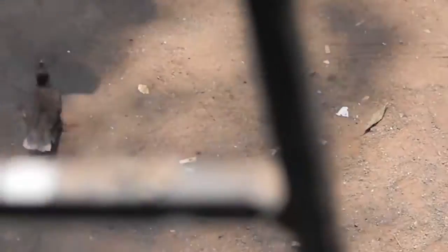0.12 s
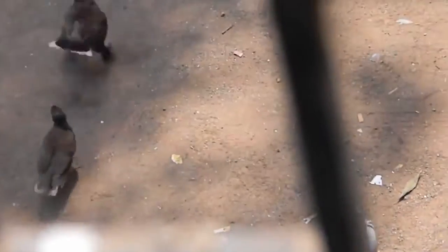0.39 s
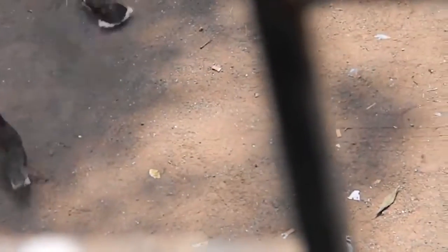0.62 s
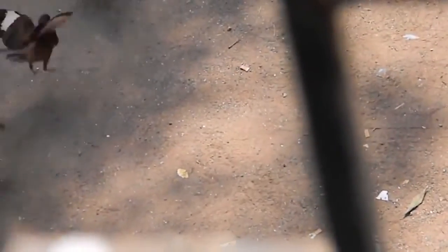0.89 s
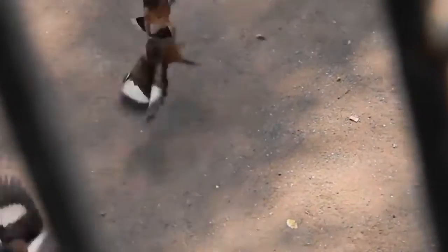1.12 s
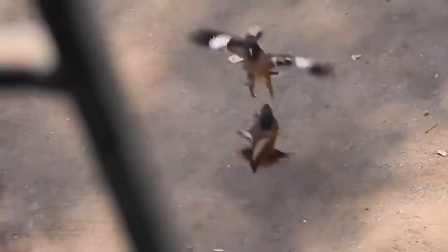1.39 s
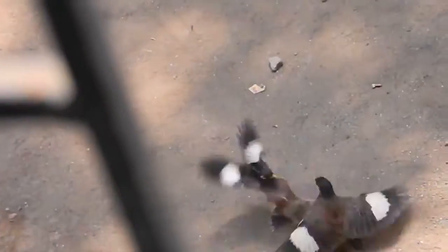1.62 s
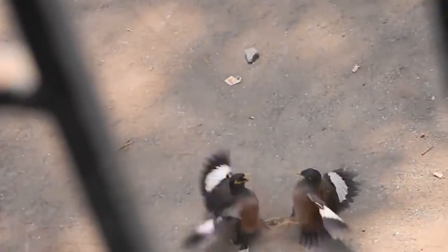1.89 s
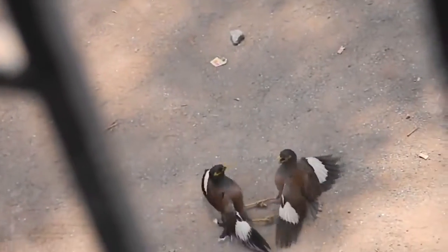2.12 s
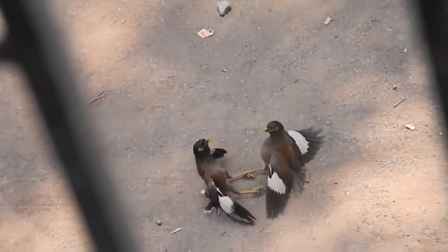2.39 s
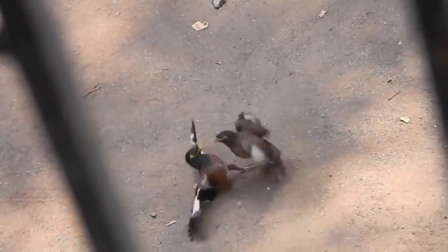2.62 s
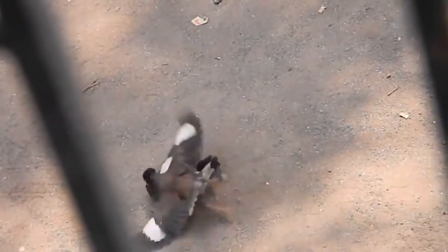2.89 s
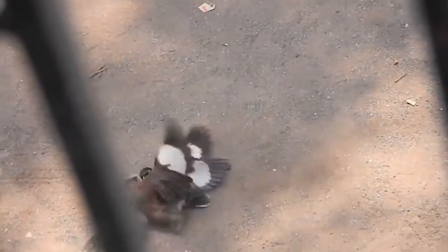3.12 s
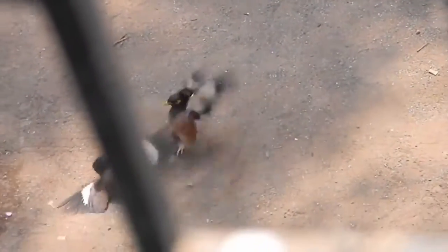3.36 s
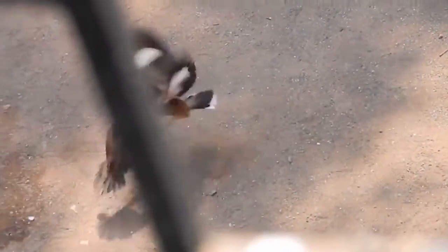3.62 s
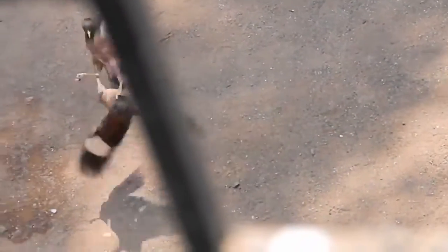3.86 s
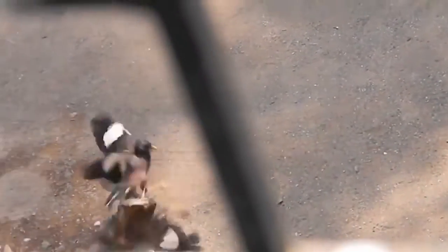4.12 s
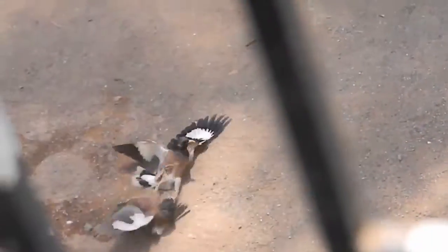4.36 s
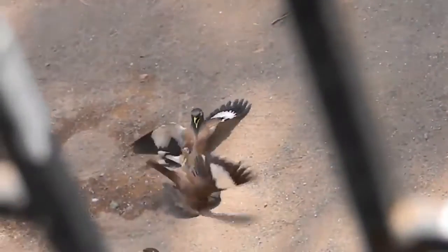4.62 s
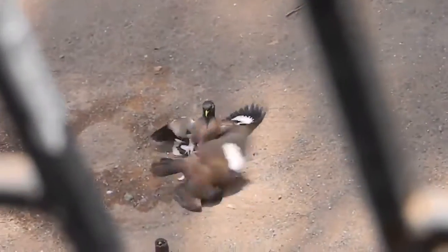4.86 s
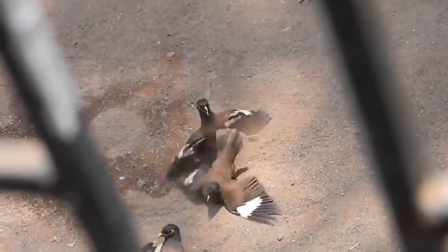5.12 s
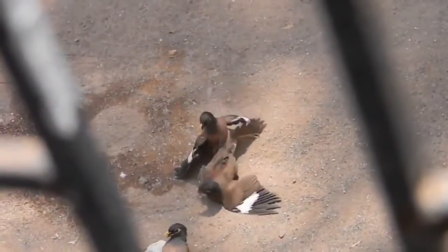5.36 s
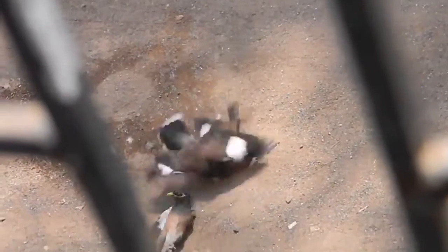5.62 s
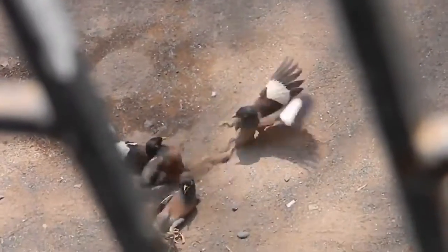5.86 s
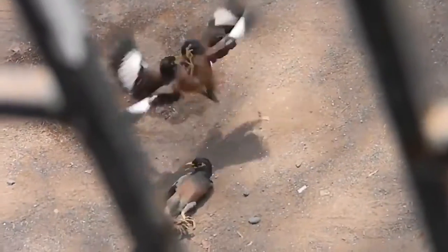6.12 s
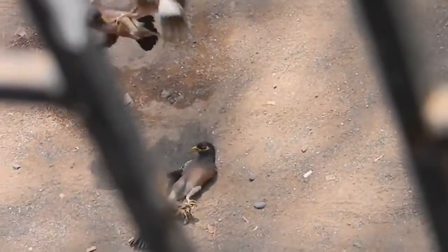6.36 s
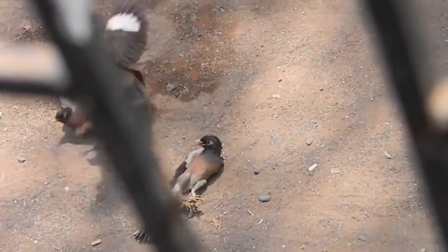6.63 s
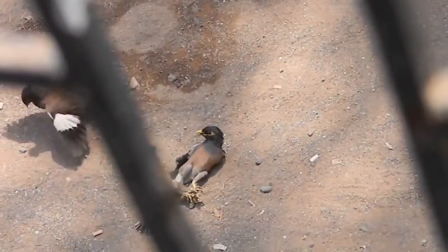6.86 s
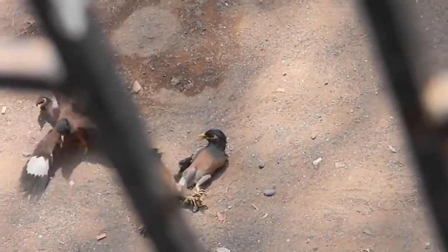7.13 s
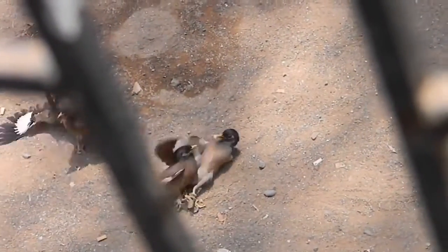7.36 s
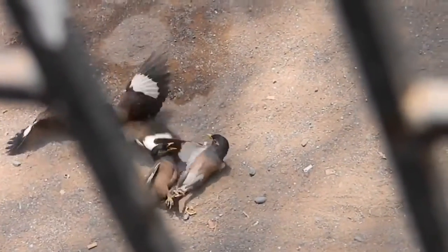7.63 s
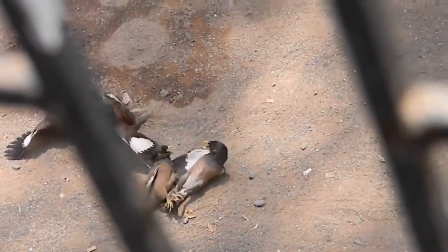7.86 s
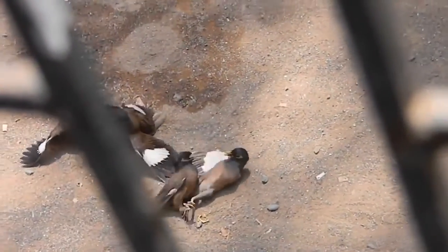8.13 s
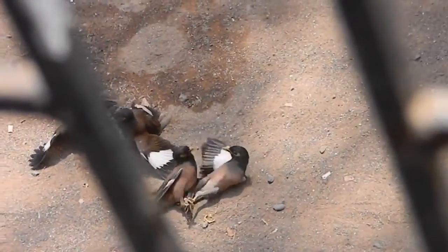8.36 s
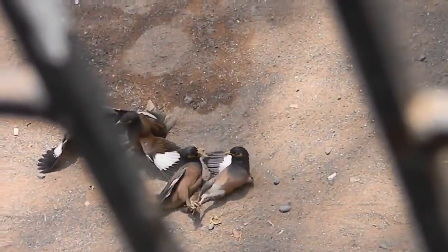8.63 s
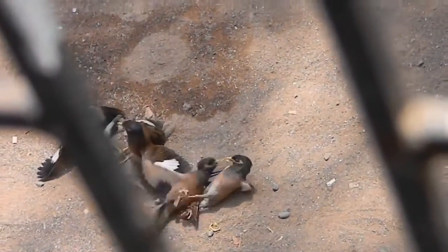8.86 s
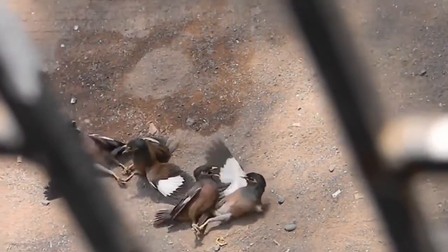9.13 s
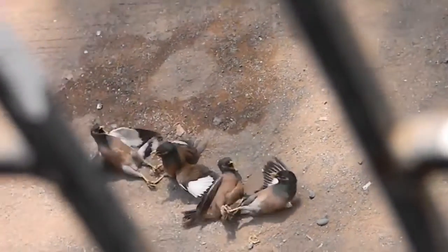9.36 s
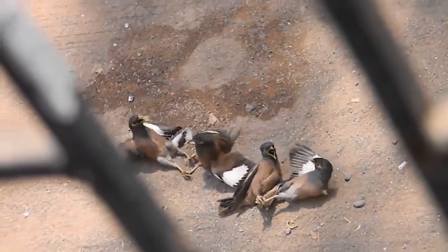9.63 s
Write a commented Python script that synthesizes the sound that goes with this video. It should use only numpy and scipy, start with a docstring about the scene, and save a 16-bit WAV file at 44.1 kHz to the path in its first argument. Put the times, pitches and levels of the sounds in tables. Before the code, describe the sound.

From 0 s a flock of mynas is mid-fight on paved ground, giving a dense, unbroken stream of very short, high calls. Harsh noisy squawks and breathy rasps mix with hoarse chirps, thin whistles scooping upward, swoops that plunge and level off, drooping notes and buzzing trills. Fainter birds chatter constantly behind. Around 1.3 s the distant town bass swells briefly. From 3 to 5 s the calls are a little more spaced, with some lower, fainter glides; layered, falling cries begin near 4.9 s. Strong sharp shrieks burst out about 5.5-6.3 s, and loud chirps again around 7.5-7.7 s. From 8 to 9.7 s harsh squawks and double-stroke cries recur a few times a second, ending mid-quarrel. A light wall echo follows everything, over a muted traffic wash and very faint wavering low hum. Close stereo pickup; the background ducks under loud calls.

```python
"""Chirps and harsh squawks break out at once over a town's steady wash: mynas fight on paved ground below a railing.
Whistles, swoops, drooping notes, trills and cries overlap, each a pitch law driving a voice of partials; squawks and
rasps are bands of noise. Ground and walls throw the birds back as early bounces and a random-tap tail, while shaped
noise makes the town and a wavering low tone its hum. A small recorder with two ports and gain control listens."""
import sys
import numpy as np
from scipy import signal
from scipy.fft import rfft, irfft, next_fast_len
from scipy.io import wavfile
from scipy.ndimage import uniform_filter1d

SR = 44100
rng = np.random.default_rng(int(sys.argv[2]) if len(sys.argv) > 2 else 0)


def ratio_of_db(decibels):
    """Turn decibels (scalar or array-like) into linear amplitude factors; 0 dB maps to 1."""
    return 10 ** (np.asarray(decibels, float) / 20)


def int16_out(signal):
    """Quantize to a 16-bit WAV file."""
    q = np.round(np.clip(np.atleast_2d(signal).T, -1, 1) * 32767)
    wavfile.write(sys.argv[1], SR, q.astype(np.int16))


N = 429534

# Levels in the tables are relative: source gains and the recorder's gain come on top.
# whistles that scoop up into a held note:
# (time [s], length [s], pitch [Hz], level [dB], octave overtone [dB])
WHISTLES = [(0.194, 0.049, 4390, -22.5, -29), (0.535, 0.058, 4390, -20.5, -33),
            (1.14, 0.03, 4165, -21, -15), (1.51, .03, 4290, -28, -27), (1.946, 0.056, 4220, -20, -37),
            (2.309, 0.054, 4335, -26.5, -26), (2.676, 0.053, 4323, -23.5, -26),
            (2.877, 0.026, 3380, -20.5, -24), (4.052, 0.061, 4030, -24, -12),
            (4.664, 0.017, 4450, -23, -41), (6.544, 0.035, 4320, -22.5, -26),
            (6.735, 0.063, 4055, -31.5, -17), (6.855, 0.035, 4420, -25.5, -24),
            (7.253, 0.032, 4410, -27.5, -22.5), (7.657, 0.038, 4350, -23, -25),
            (8.325, 0.038, 4320, -23.5, -23)]
# swoops that drop fast and level off:
# (time [s], length [s], top [Hz], bottom [Hz], settling time [s], level [dB])
SWOOPS = [(0.059, 0.043, 3300, 1514, 0.025, -23.5), (0.411, 0.092, 6700, 1610, 0.034, -20),
          (0.748, .04, 3200, 1480, 0.021, -26), (1.05, 0.11, 6600, 1603, 0.033, -23),
          (1.387, 0.066, 3800, 1415, 0.025, -25), (1.453, 0.024, 3900, 2170, 0.013, -23),
          (1.567, 0.07, 2850, 2315, 0.0089, -18.5), (2.59, 0.059, 3240, 2230, 0.0083, -23),
          (2.917, 0.035, 3800, 2905, .01, -23), (3.052, 0.038, 3500, 2006, 0.017, -19.5),
          (3.57, .042, 6700, 3100, .012, -22), (3.632, 0.049, 3300, 1426, .045, -22),
          (4.346, 0.046, 3500, 1816, 0.016, -24), (4.742, 0.036, 3800, 1785, 0.022, -20.5),
          (5.123, 0.031, 3500, 1830, 0.019, -25), (5.408, 0.069, 3500, 2300, 0.013, -20.5),
          (5.559, 0.036, 6500, 3770, 0.0054, -15.5), (5.591, 0.094, 3850, 3092, 0.016, -15.5),
          (5.707, 0.022, 2900, 1980, .015, -18.5), (5.944, 0.033, 6500, 3670, 0.0065, -26),
          (5.959, 0.061, 3600, 2860, .03, -21), (6.17, .025, 5800, 3360, 0.0054, -23),
          (6.201, 0.089, 3400, 2993, 0.055, -16), (6.774, .043, 3500, 1970, .018, -19.5),
          (6.903, 0.1, 3700, 2566, 0.02, -16.5), (7.129, 0.031, 3400, 1920, 0.013, -17),
          (7.171, 0.079, 6600, 1695, 0.031, -19.5), (7.295, 0.15, 3600, 2495, .04, -21.5),
          (7.415, 0.04, 3300, 1894, 0.02, -24), (8.025, 0.074, 4200, 2156, 0.017, -19),
          (8.364, 0.027, 3400, 1900, 0.018, -18.5), (8.698, 0.053, 3200, 2135, 0.013, -21.5),
          (8.998, .04, 3500, 2020, 0.014, -23.5), (9.428, 0.063, 3340, 2320, .01, -22),
          (9.614, 0.05, 3500, 1770, .02, -27)]
# held notes that bend away at the end: (time [s], length [s], first pitch [Hz], last pitch [Hz], level [dB])
DROOPS = [(0.262, .08, 3080, 2740, -22), (0.329, 0.051, 2100, 1765, -28), (0.844, .051, 2746, 2780, -20),
          (2.009, 0.081, 3013, 2320, -17), (2.156, 0.088, 3080, 2305, -24),
          (2.364, 0.097, 2970, 2490, -19.5), (2.649, .054, 2980, 2640, -22.5),
          (2.733, 0.064, 2967, 2810, -21), (2.93, 0.1, 3060, 1900, -22.5),
          (3.781, 0.077, 2710, 1950, -28.5), (4.117, 0.084, 3066, 2134, -17.5),
          (4.197, 0.046, 2550, 2180, -26), (4.556, 0.036, 2454, 2150, -23.5),
          (4.856, 0.029, 3570, 3400, -22), (4.88, 0.088, 2525, 2130, -23), (5.59, 0.11, 2484, 2025, -23),
          (5.972, 0.073, 2574, 2210, -17.5), (6.291, 0.075, 2620, 2265, -19), (7.0, 0.07, 2515, 2200, -24),
          (7.714, 0.097, 2530, 2250, -17), (7.804, 0.036, 2250, 1890, -26), (8.401, .08, 2620, 1994, -19),
          (8.923, .055, 2304, 1500, -22.5), (9.304, 0.045, 3310, 1860, -21)]
# notes chopped by the second membrane: (time [s], length [s], first pitch [Hz], last pitch [Hz], level [dB])
TRILLS = [(0.595, 0.087, 3350, 3320, -26.5), (1.729, 0.088, 3230, 3370, -21),
          (2.455, 0.1, 3200, 3320, -22.5), (3.249, 0.092, 3220, 3214, -20.5),
          (6.607, .093, 3350, 3200, -22.5), (7.466, 0.084, 3540, 3380, -22.5),
          (8.11, 0.082, 3430, 3450, -26), (8.763, 0.12, 3340, 3380, -24.5), (8.872, 0.069, 3510, 2880, -22),
          (9.125, .075, 4150, 3920, -26), (9.138, 0.054, 5560, 5100, -27.5), (9.2, 0.063, 3300, 3280, -27),
          (9.538, 0.085, 4070, 4140, -28.5), (9.538, .09, 5980, 6050, -37)]
# straight glides: (time [s], length [s], first pitch [Hz], last pitch [Hz], level [dB])
CHIRPS = [(0.001, 0.024, 3040, 3420, -24), (0.238, 0.034, 2480, 2980, -26), (0.065, .075, 3650, 3600, -27),
          (0.356, 0.032, 3085, 2580, -27), (0.617, 0.038, 2950, 2900, -20.5),
          (0.715, 0.054, 3360, 3120, -26.5), (0.789, 0.035, 2610, 3700, -26),
          (0.824, 0.029, 3980, 3260, -22.5), (0.804, .024, 6030, 6050, -31),
          (0.908, 0.025, 2516, 2700, -22.5), (0.918, 0.04, 4380, 4210, -24.5),
          (1.175, 0.024, 3520, 2790, -28.5), (2.085, 0.031, 2300, 1100, -31),
          (2.452, 0.027, 2400, 1750, -28), (3.04, 0.05, 1880, 1150, -36), (7.835, 0.047, 1800, 1264, -30),
          (5.93, 0.014, 3600, 2300, -21.5), (0.957, 0.019, 3710, 3570, -21.5),
          (1.308, 0.045, 2094, 2440, -25), (1.359, 0.044, 4830, 5450, -30), (1.475, 0.035, 2540, 2960, -29),
          (1.827, 0.029, 3160, 3110, -17), (1.847, 0.065, 2240, 2127, -26.5),
          (1.87, 0.022, 4350, 3820, -32), (2.098, 0.063, 2920, 3860, -24.5), (2.222, .106, 3560, 3370, -29),
          (2.324, 0.031, 3450, 3500, -28), (2.57, 0.026, 3290, 3230, -23), (2.634, .019, 3530, 3500, -24),
          (2.74, 0.048, 2140, 1950, -27), (3.358, 0.013, 3230, 3300, -17), (3.397, 0.071, 3270, 3300, -35),
          (3.388, .06, 2250, 2140, -28), (3.536, 0.017, 1970, 5100, -30), (3.541, 0.01, 5140, 6670, -19.5),
          (3.582, 0.075, 3740, 3930, -23), (3.699, .033, 2230, 3650, -27), (3.705, .036, 5080, 5260, -32),
          (3.728, .05, 2155, 2350, -24), (3.733, 0.019, 3590, 3510, -19), (3.859, 0.22, 1710, 1658, -29),
          (4.073, 0.035, 2200, 3520, -24), (4.253, 0.045, 2210, 2480, -27), (4.425, 0.03, 2234, 3290, -22),
          (4.471, 0.025, 3490, 3460, -30), (4.481, 0.056, 2895, 2480, -26), (4.47, 0.15, 1756, 1590, -30),
          (4.76, 0.04, 4250, 3750, -26.5), (4.82, 0.026, 2230, 3520, -21), (5.052, 0.106, 1703, 1645, -29),
          (5.07, .028, 3560, 4050, -29), (5.355, 0.043, 3570, 3880, -32.5), (5.53, 0.013, 2200, 6600, -27),
          (5.798, 0.054, 3150, 3150, -29.5), (5.906, .012, 4840, 6670, -19), (5.9, .013, 2190, 4900, -30),
          (6.112, 0.071, 2415, 2370, -21.5), (6.145, 0.017, 3100, 3140, -17.5),
          (6.26, 0.026, 6430, 3850, -28), (6.401, 0.031, 3090, 3160, -32), (6.568, 0.13, 2280, 2645, -24),
          (6.586, 0.057, 3040, 2890, -23), (6.9, 0.038, 4060, 4070, -24), (7.135, .02, 5140, 6150, -31),
          (7.196, 0.032, 6300, 4000, -32), (7.328, 0.036, 5800, 5270, -34.5),
          (7.428, 0.029, 5030, 5190, -30), (7.551, 0.044, 3960, 4340, -16),
          (7.604, 0.087, 3110, 3050, -24.5), (7.616, 0.1, 2210, 2510, -24.5),
          (7.7, 0.011, 3420, 3400, -14.5), (7.733, .013, 3300, 3210, -19), (7.949, 0.05, 3270, 3280, -29),
          (8.318, 0.022, 3700, 3580, -24), (8.346, 0.02, 3140, 3470, -15.5), (8.48, 0.044, 2070, 1710, -28),
          (8.609, 0.046, 2130, 2580, -27), (8.736, 0.047, 4570, 4350, -36), (9.071, 0.045, 5980, 5860, -38),
          (9.058, 0.039, 3100, 2910, -25), (9.276, 0.016, 3030, 2950, -14),
          (9.286, .034, 2424, 1780, -21.5), (9.64, 0.07, 3530, 3600, -24),
          (9.701, 0.039, 3940, 3740, -28.5)]
# harsh noisy squawks: (time [s], nominal length [s], effort [dB], centre [Hz])
SQUAWKS = [(0.009, 0.048, -23.5, 4570), (0.239, 0.1, -26, 4290), (0.357, 0.058, -33.5, 4830),
           (0.561, 0.091, -32.5, 4410), (0.786, 0.077, -41, 4740), (0.901, 0.28, -32, 4660),
           (1.315, 0.14, -36, 4680), (1.511, 0.049, -28.5, 4320), (1.725, 0.085, -39.5, 4670),
           (1.875, 0.13, -29, 4390), (2.101, 0.075, -31, 4250), (2.225, 0.089, -34, 4670),
           (2.35, 0.032, -32, 4240), (2.6, 0.069, -37, 4320), (2.709, 0.052, -31, 4290),
           (2.996, 0.054, -32, 4600), (3.528, 0.074, -32.5, 4640), (3.709, 0.049, -44, 4230),
           (4.041, 0.11, -33, 3950), (4.276, 0.07, -32, 4610), (4.676, 0.13, -33.5, 4440),
           (4.888, 0.066, -29.5, 4330), (5.066, 0.087, -27.5, 4340), (5.369, 0.11, -28, 4100),
           (5.521, 0.15, -31.5, 4260), (5.896, 0.072, -31.5, 5070), (6.158, 0.084, -33, 4230),
           (6.557, 0.088, -36, 4220), (6.647, 0.19, -35, 4380), (6.874, 0.024, -40, 4400),
           (7.074, 0.12, -31.5, 4730), (7.363, 0.076, -32.5, 4740), (7.456, 0.031, -33, 4020),
           (7.626, 0.054, -28.5, 4200), (7.977, 0.095, -30.5, 4460), (8.07, 0.095, -32.5, 4140),
           (8.245, 0.1, -25.5, 4250), (8.525, 0.26, -30, 4320), (8.639, 0.044, -32, 4640),
           (8.77, 0.088, -26.5, 4310), (8.959, 0.1, -26, 4260), (9.132, 0.25, -31, 4150),
           (9.406, 0.097, -27.5, 4140), (9.573, 0.09, -26, 4430)]
# noise bands of a squawk: (place [multiple of the centre], smoothing width [Hz], level [dB])
SQUAWK_BANDS = [(.62, 1200, -8.5), (1.05, 900, -8.5), (1.35, 1270, -6), (2.15, 1880, -10),
                (3.198, 4000, -19.5)]
# cries of stacked partials in two falling strokes:
# (time [s], length [s], first pitch [Hz], last pitch [Hz], level [dB])
CRIES = [(4.899, 0.061, 3260, 2970, -30), (5.131, 0.059, 3450, 2890, -32),
         (5.377, 0.073, 3445, 3055, -30.5), (7.974, .09, 3280, 2935, -32.5),
         (8.249, 0.078, 3390, 2990, -34.5), (8.526, 0.065, 3275, 2956, -30),
         (8.786, 0.072, 3310, 2810, -29), (8.982, 0.075, 3290, 2840, -34.5),
         (9.21, 0.076, 3220, 2870, -32.5), (9.419, 0.067, 3260, 3010, -34), (9.615, 0.071, 3330, 3050, -36)]
# short rasps of breath noise, most of them ahead of a swoop: (time [s], length [s], centre [Hz], level [dB])
RASPS = [(0.006, 0.057, 4600, -25.5), (0.283, 0.053, 4800, -25), (0.594, .045, 4560, -27),
         (3.007, .042, 4550, -25.5), (4.303, 0.034, 4650, -22), (4.699, 0.047, 4440, -18.5),
         (5.078, .044, 4880, -24), (6.743, 0.046, 4840, -24), (7.087, 0.043, 4800, -23),
         (7.372, .042, 4720, -22.5), (8.658, .045, 4600, -22), (8.96, 0.034, 4680, -37),
         (9.58, 0.033, 4480, -27)]
# added partials of the voice: (partial [multiple of a third of the pitch], level [dB])
STACK = [(2, -14.5), (4, 5), (5, -4.5), (6, -41), (7, -15.5)]
# first answers of the ground and nearest walls: (delay [s], level against the direct sound [dB])
BOUNCES = [(.0013, -24), (.0031, -10), (.0062, -12.5)]
# dying time of the wall echo: (frequency [Hz], t60 [s])
WALL_DECAY = [(1000, 0.92), (3000, 0.71), (8000, 0.62)]
# colour of the town wash: (frequency [Hz], relative density [dB])
TOWN_COLOUR = [(15, -65), (30, -50), (50, -26), (76, -4.5), (137, 2), (307, -10), (425, 0), (654, -3),
               (1470, -3.5), (2330, -7), (3050, -9), (5820, -17), (6850, -26), (8270, -23), (11100, -36),
               (15800, -37.5)]
# swell of traffic and breeze, used around its mean: (time [s], bass level [dB])
RUMBLE = [(0.0, -36.5), (1.16, -37), (1.27, -27.5), (2.12, -36.5), (2.28, -32), (2.47, -40), (3.5, -32),
          (6.16, -34), (6.35, -42), (6.37, -35), (9.52, -36), (9.74, -41)]
# likeness of the wash at both ports: (frequency [Hz], correlation [0 to 1])
LIKENESS = [(60, 0.88), (250, 1), (700, 0.75), (1500, 0.44), (3000, 0.32), (10000, 0.71)]
# a faint wavering low hum, perhaps of far machines: (frequency [Hz], level [dB])
HUM = [(430.7, -46)]
# phase lead of the left port: (frequency [Hz], lead [radians])
PORT_LEAD = [(20, 0.2), (230, -0.22), (340, -1.78), (950, -1.53), (1460, -1.73), (1720, -1.88), (2240, 1.3),
             (3010, 1.3), (3790, 0.82), (4050, 1.3), (4390, 1.07), (5250, 1.1), (6030, 1.1), (9220, 0.45),
             (15600, 0.38)]
# level balance of the ports: (frequency [Hz], left minus right [dB])
PORT_TILT = [(60, 3), (110, 0.5), (200, 2.5), (380, 3), (700, -1.5), (1290, -6), (2380, -8), (4400, -2),
             (8120, -1.0), (15000, 1)]
# complex white noise from which every hoarse voice takes a stretch
TURBULENCE = rng.standard_normal(4 * SR) + 1j * rng.standard_normal(4 * SR)


def evened(x):
    """Scales to rms 1."""
    return x / np.sqrt(np.mean(abs(x) ** 2) + 1e-20)


def read(points, hz):
    """Reads a table on a log-frequency axis."""
    f, value = np.transpose(points)
    return np.interp(np.log(hz + 1), np.log(f + 1), value)


def add(mix, s, sound):
    """Mixes a sound in at s seconds."""
    part = mix[round(s * SR):][:len(sound)]
    part += sound[:len(part)]


def wobble(n, width_hz):
    """Complex noise smoothed by two equal poles: turns a clean tone into a hoarse one."""
    r = np.exp(-np.pi * width_hz / SR)
    z = TURBULENCE[rng.integers(3 * SR):][:n + 400]
    once = signal.lfilter([1], [1, -r], z)
    twice = signal.lfilter([1], [1, -r], once)
    return evened(twice[400:])  # skips the start-up of the filters


def syrinx(hz, level_db, rough, trill, octave_db, stack_db, beads):
    """A tone with an octave and added partials; roughness breaks it into lumps, the trill chops it into pulses."""
    t = np.arange(len(hz)) / SR
    rough = np.clip(rough, 0, 1)
    shake = wobble(len(t), 170)
    # low notes are strung in beads by a slower flutter that also bends the pitch
    low = beads * np.clip((3250 - hz) / 300, 0, 1) * np.clip((hz - 1800) / 300, 0, 1)
    flutter_hz = 54.96 * (0.829 + 0.3 * rng.random())
    flutter = low * np.exp(2j * np.pi * (flutter_hz * t + rng.random()))
    # the pitch stumbles
    turns = np.cumsum(hz * (1 + 0.045 * rough * shake.imag + 0.03 * flutter.imag)) / SR
    # the voice catches and lets go
    lumps = evened(ratio_of_db((-0.5 + 3.6 * rough) * (2 - trill) * np.tanh(shake.real)))
    bead_level = evened(ratio_of_db(5 * flutter.real))
    hoarse_edge = evened(1 + 0.8 * rough * wobble(len(t), 900))
    body = lumps * bead_level * hoarse_edge
    # the second membrane beats 104.5 times a second
    beat = np.cos(2 * np.pi * (104.5 * t + rng.random()))
    chop = evened(np.exp(4.5 * np.clip(trill - 0.4, 0, 1) * beat))
    tone = np.exp(2j * np.pi * turns)
    octave = ratio_of_db(octave_db) * tone ** 2 * (1.95 + 0.77 * wobble(len(t), 600))
    # a membrane beating at a third of the pitch adds partials at its multiples; in cries the fourth is loudest
    stack = sum(ratio_of_db(db) * np.exp(2j * np.pi * k / 3 * turns) for k, db in STACK)
    voice = body * (tone + octave + ratio_of_db(stack_db) * stack)
    return np.sqrt(2) * ratio_of_db(level_db + 2.0) * chop * voice.real


def held(hz, change_db, level_db, **voice):
    """A call with 1 ms edges whose level slides by change_db from start to end."""
    t = np.arange(len(hz)) / SR
    edges = np.clip(np.minimum(t, t[::-1]) / 0.001, 0, 1)
    return edges * syrinx(hz, level_db + change_db * (t / t[-1] - 0.5), **voice)


def whistles(mix):
    """The pitch climbs exponentially into a held note."""
    scoop, scoop_s = 0.155, 0.00306  # share of the pitch below the note at the start, time constant
    for s, length_s, note_hz, level_db, octave_db in WHISTLES:
        t = np.arange(0, length_s, 1 / SR)
        hz = note_hz * (1 - scoop * np.exp(-t / scoop_s))
        add(mix, s, held(hz, -6, level_db, rough=0.16, trill=0, octave_db=octave_db, stack_db=-32, beads=0))


def swoops(mix):
    """The pitch drops exponentially and levels off in a hoarse voice."""
    for s, length_s, top_hz, bottom_hz, settle_s, level_db in SWOOPS:
        t = np.arange(0, length_s, 1 / SR)
        hz = bottom_hz + (top_hz - bottom_hz) * np.exp(-t / settle_s)
        add(mix, s, held(hz, 1.5, level_db, rough=0.5, trill=0, octave_db=-29, stack_db=-36, beads=0.6))


def droops(mix):
    """The pitch holds, then gives way along a power curve in a hoarse, beaded voice."""
    bend = 2.5  # the higher, the later the pitch gives way
    for s, length_s, first_hz, last_hz, level_db in DROOPS:
        hz = first_hz + (last_hz - first_hz) * np.linspace(0, 1, round(length_s * SR)) ** bend
        add(mix, s, held(hz, -4, level_db, rough=0.5, trill=0.1, octave_db=-30, stack_db=-32, beads=1))


def trills(mix):
    """A gliding note is pulsed by the second membrane."""
    for s, length_s, first_hz, last_hz, level_db in TRILLS:
        hz = np.geomspace(first_hz, last_hz, round(length_s * SR))
        add(mix, s, held(hz, -1.5, level_db, rough=0.3, trill=0.8, octave_db=-31, stack_db=-40, beads=0.3))


def chirp(length_s, first_hz, last_hz, level_db, rough):
    """One glide that starts sharply and fades."""
    n = round(length_s * SR)
    hz = np.geomspace(first_hz, last_hz, n)
    rise = np.arange(n) / (0.046 * n)
    fade = np.arange(n)[::-1] / (0.17 * n)
    shape = np.clip(np.minimum(rise, fade), 0, 1)
    return shape * syrinx(hz, level_db, rough, trill=0, octave_db=-24.5, stack_db=-27, beads=0.81)


def chirps(mix):
    """Single short glides of the birds close by, in a hoarse voice."""
    for s, *glide in CHIRPS:
        add(mix, s, chirp(*glide, rough=0.59))


def squawks(mix):
    """The membrane flaps chaotically: hoarse bands around a falling centre, shot through with little shrieks."""
    shrieks = 5  # in each squawk
    for s, length_s, effort_db, hz in SQUAWKS:
        n = round(1.1 * length_s * SR)
        turns = np.cumsum(hz * np.geomspace(1.06, 0.94, n)) / SR
        bands = sum(ratio_of_db(db) * wobble(n, width_hz) * np.exp(2j * np.pi * k * turns)
                    for k, width_hz, db in SQUAWK_BANDS)
        bursts = ratio_of_db(2.5 * wobble(n, 90).real)
        shape = signal.windows.tukey(n, 0.5)
        add(mix, max(s - 0.15 * length_s, 0), ratio_of_db(effort_db) * shape * bursts * bands.real)
        for when, high, long in rng.random((shrieks, 3)):
            top_hz = hz * (0.6 + 0.85 * high)
            shriek_db = effort_db + 3.5 - 7 * high
            shriek = chirp(0.01235 + 0.0213 * long, top_hz, 0.84 * top_hz, shriek_db, rough=0.4)
            add(mix, s + when * length_s, shriek)


def cries(mix):
    """A voice of stacked partials in two strokes, each flicked up and falling."""
    stroke_drop = 0.178  # share of the pitch each stroke spans before its corners are smoothed
    for s, length_s, first_hz, last_hz, level_db in CRIES:
        n = round(length_s * SR)
        saw = 0.5 - (np.linspace(0, 2, n) - 0.08) % 1
        saw = uniform_filter1d(saw, 250, mode="nearest")
        hz = np.geomspace(first_hz, last_hz, n) * (1 + stroke_drop * saw)
        add(mix, s, held(hz, -0.39, level_db, rough=0.3, trill=0, octave_db=-17, stack_db=1, beads=0))


def rasps(mix):
    """Breath noise: a bare band around a steady centre."""
    for s, length_s, hz, level_db in RASPS:
        t = np.arange(0, length_s, 1 / SR)
        band = wobble(len(t), 890) * np.exp(2j * np.pi * hz * t)
        add(mix, s, ratio_of_db(level_db - 0.5) * signal.windows.tukey(len(t), 0.25) * band.real)


def chatter(mix):
    """Birds further off: faint hoarse glides at random times, mostly falling."""
    per_s, loudest_db = 70, -33
    for when, long, high, fall, faint in rng.random((round(per_s * N / SR), 5)):
        hz = 1900 * 2.2 ** high
        last_hz = hz * (1.08 - 0.45 * fall)
        note = chirp(0.01228 + 0.0291 * long, hz, last_hz, loudest_db - 8 * faint, rough=0.65)
        add(mix, when * N / SR, note)


def bounced(x):
    """The direct sound and its first few reflections, turned over in sign."""
    taps = np.zeros(round(0.03 * SR))
    taps[0] = 1
    for delay_s, db in BOUNCES:
        taps[round(delay_s * SR)] = -ratio_of_db(db)
    return signal.oaconvolve(x, taps / np.linalg.norm(taps))[:N]


def walls(x):
    """Sparse taps of random sign, one in every 20 samples, each band dying at its own speed."""
    taps = np.zeros((2, SR))
    at = np.arange(500, SR - 20, 20) + rng.integers(0, 20, (2, (SR - 501) // 20))
    np.put_along_axis(taps, at, rng.choice([-1., 1.], at.shape), 1)
    taps[1] = 0.64 * taps[0] + 0.83 * taps[1]  # the two sides are partly alike
    hz, t, z = signal.stft(taps, SR, nperseg=256)
    decay = ratio_of_db(-60 * t / read(WALL_DECAY, hz)[:, None])
    tail = signal.istft(z * decay, SR, nperseg=256)[1]
    return signal.fftconvolve(x[None], tail / np.linalg.norm(tail[0]), axes=1)[:, :N]


def town():
    """Random short-time spectra with drifting patches; the bass swells by itself."""
    frames, hz = N // 256 + 5, np.fft.rfftfreq(1024, 1 / SR)
    a, b, c, d, patches = rng.standard_normal((frames, 513, 5)).T
    patches = uniform_filter1d(patches, 12, 0)  # across frequency
    patches = evened(uniform_filter1d(patches, 14, 1))  # across time
    s, rumble_db = np.transpose(RUMBLE)
    swell_db = np.interp(np.arange(frames) * 256 / SR, s, rumble_db - rumble_db.mean())
    bass_db = swell_db / (1 + (hz[:, None] / 400) ** 2)
    same = np.clip(read(LIKENESS, hz), -1, 1)[:, None]
    left = a + 1j * b
    right = same * left + np.sqrt(1 - same ** 2) * (c + 1j * d)
    z = np.array([left, right])
    z *= ratio_of_db(read(TOWN_COLOUR, hz)[:, None] + 2.15 * patches + bass_db)
    wash = signal.istft(z, nperseg=1024, noverlap=768)[1][:, :N]
    return ratio_of_db(-26.75) * evened(wash)


def hum():
    """A narrow low tone that wavers a little, laid in overlapping stretches."""
    t = np.arange(3 * SR // 4) / SR
    out = np.zeros(N)
    for hz, db in HUM:
        for s in np.arange(0, N / SR, 0.375):
            tone = wobble(len(t), 9.1) * np.exp(2j * np.pi * hz * t)
            add(out, s, ratio_of_db(db + 6) * np.hanning(len(t)) * tone.real)
    return out


def scene():
    """Birds, their echo, the town and its hum."""
    birds = np.zeros(N)
    for source in (whistles, swoops, droops, trills, chirps, squawks, cries, rasps, chatter):
        source(birds)
    return bounced(birds) + ratio_of_db(-9.5) * walls(birds) + town() + hum()


def ports(hz):
    """Gain and phase of the left and right port, with their mean power kept at 1."""
    half = ratio_of_db(read(PORT_TILT, hz) / 2) * np.exp(0.5j * read(PORT_LEAD, hz))
    pair = np.array([half, 1 / half])
    return pair / np.sqrt((abs(pair) ** 2).mean(0))


def band_limit(x):
    """A steep low-pass at the top of the band."""
    return signal.sosfilt(signal.butter(12, 16040, fs=SR, output="sos"), x)


def record(dry):
    """The port pair colours each side; gain control ducks the wash under loud calls; peaks round off."""
    size = next_fast_len(N + 4096)
    x = irfft(rfft(dry, size) * ports(np.fft.rfftfreq(size, 1 / SR)), size)[:, :N]
    power_db = 10 * np.log10(abs(uniform_filter1d((x ** 2).mean(0), 400)) + 1e-12)
    fall_db = np.arange(N) * 53.5 / SR  # the sensed level sinks by at most 53.5 dB a second
    sensed_db = np.maximum.accumulate(power_db + fall_db) - fall_db
    over_db = np.maximum(sensed_db + 19.0, 0)  # above a threshold of -19 dB
    gain_db = 3.0 - 0.69 * uniform_filter1d(over_db, 300)
    finished = 0.78 * np.tanh(x * ratio_of_db(gain_db) / 0.79)
    return band_limit(finished)


dry = scene()
out = record(dry)
int16_out(out)
```